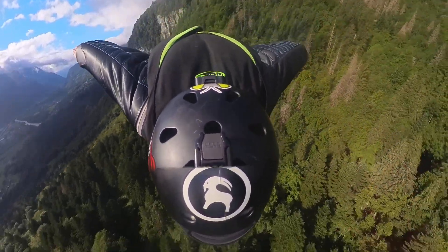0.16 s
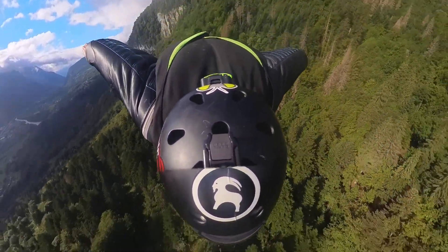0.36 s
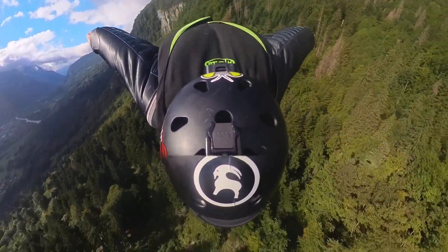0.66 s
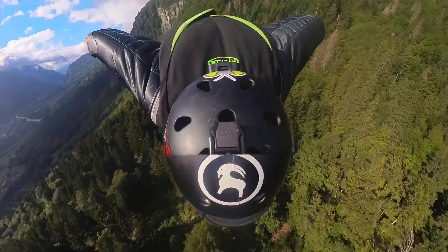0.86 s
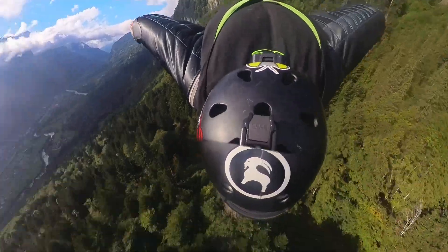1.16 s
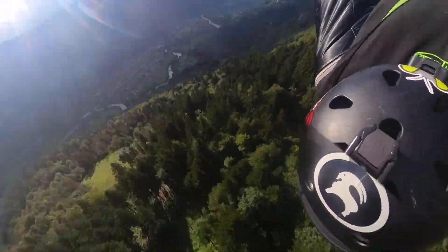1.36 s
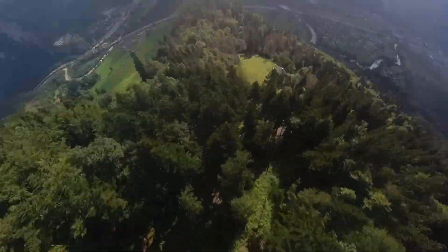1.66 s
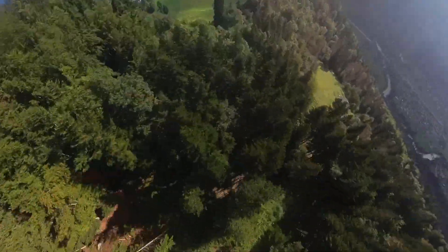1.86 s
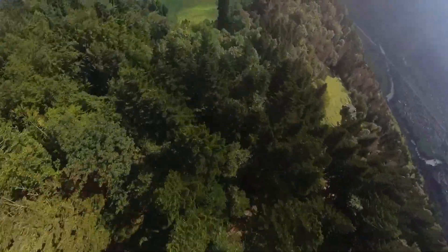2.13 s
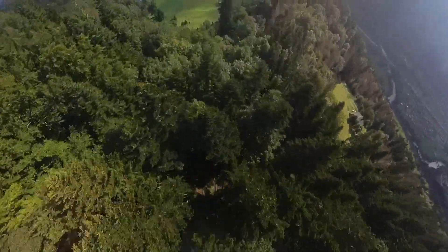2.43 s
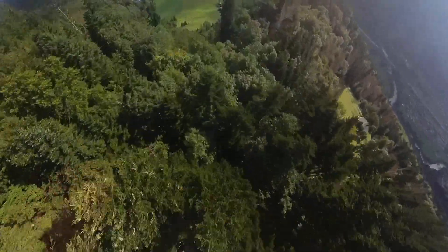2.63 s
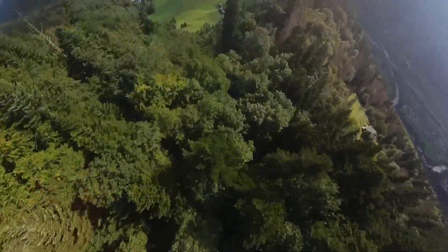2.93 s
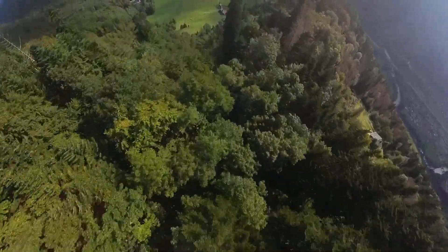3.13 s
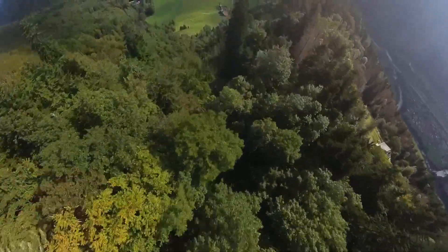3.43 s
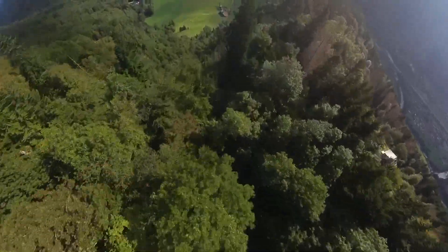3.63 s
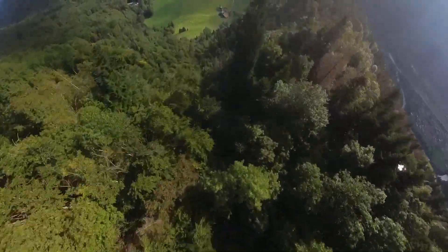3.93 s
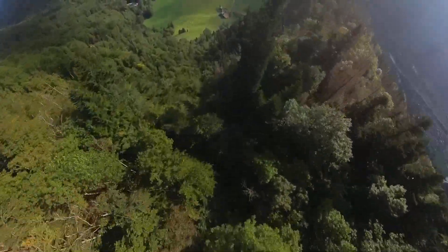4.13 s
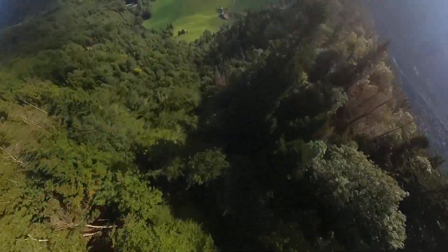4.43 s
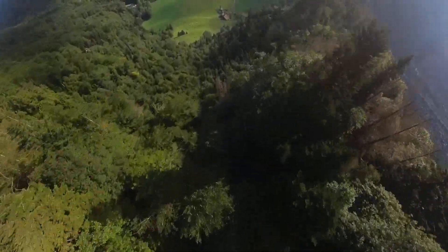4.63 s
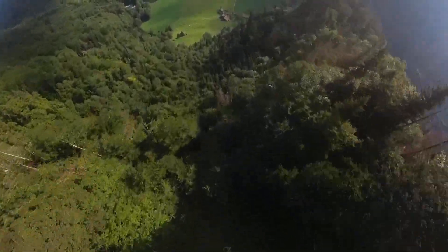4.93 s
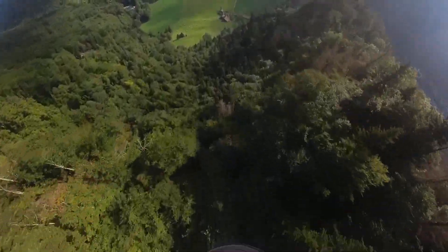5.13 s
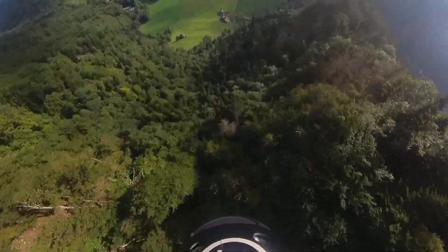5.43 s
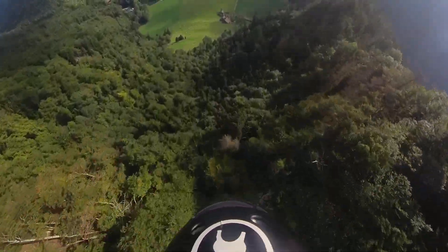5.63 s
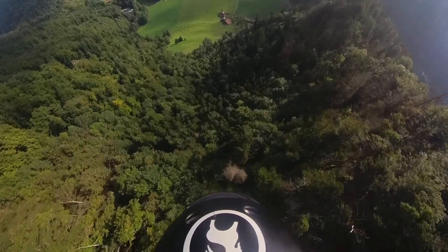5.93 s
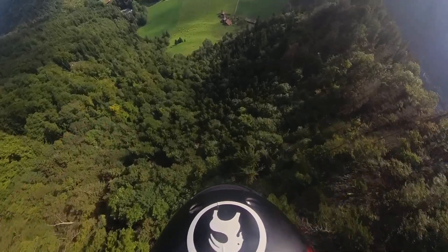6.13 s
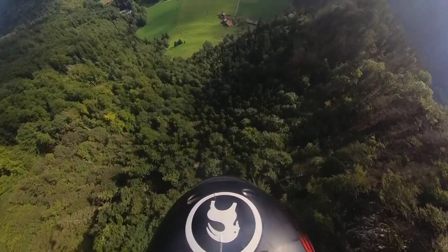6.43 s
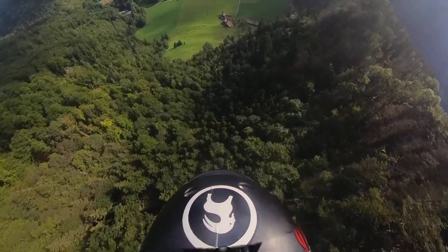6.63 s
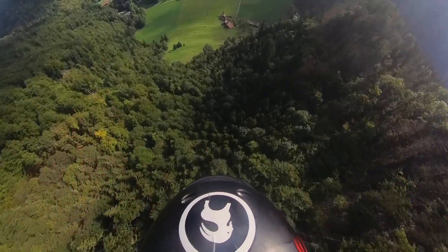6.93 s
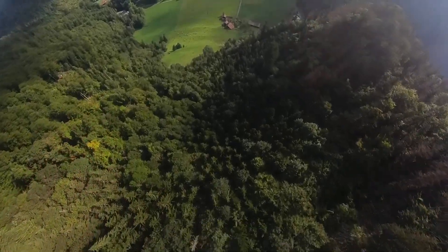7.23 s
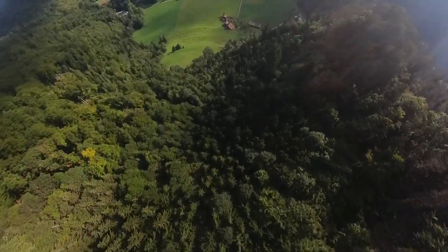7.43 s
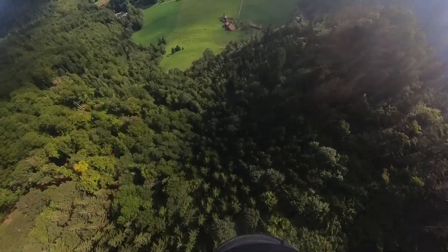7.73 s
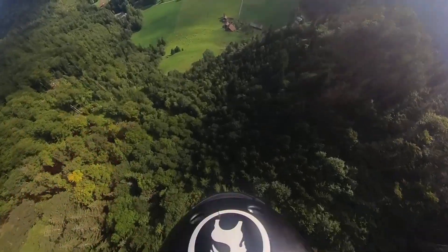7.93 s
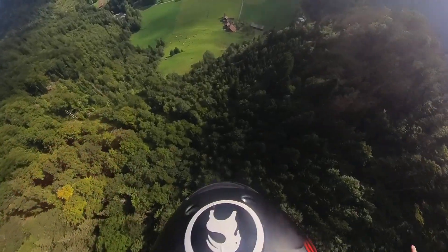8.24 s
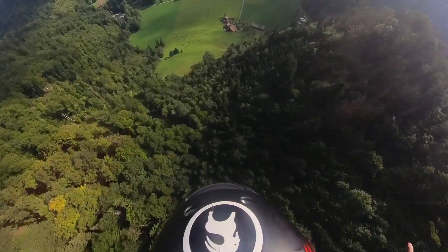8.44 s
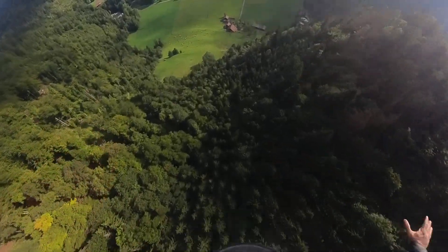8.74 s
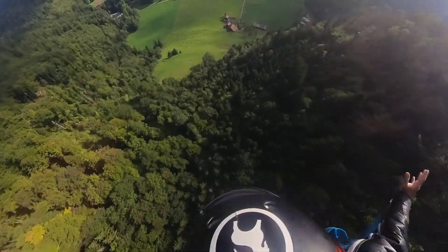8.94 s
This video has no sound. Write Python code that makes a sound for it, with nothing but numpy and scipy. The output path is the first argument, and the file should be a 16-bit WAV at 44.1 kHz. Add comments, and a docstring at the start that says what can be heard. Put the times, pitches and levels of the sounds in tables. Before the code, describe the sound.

Deep, buffeting wind rushes steadily across a microphone in fast flight, topped by a thin hiss and faint airy whistles.

```python
"""A deep, uneven rumble of wind, right on a helmet camera in a fast wingsuit glide above a forest.
Eddies buffet the microphone; the attached flow roars over the rumble, and fine turbulence hisses
at each port, with brief airy whistles where the air skims an edge.
The wind is mono in the bass and middle, wide in the treble."""
import sys
import numpy as np
from scipy import signal
from scipy.fft import rfft, irfft, next_fast_len
from scipy.io import wavfile
from scipy.ndimage import uniform_filter1d

SR = 44100
rng = np.random.default_rng(int(sys.argv[2]) if len(sys.argv) > 2 else 0)


def waveform_to_disk(signal):
    """Save audio, clipped to [-1, 1], as 16-bit WAV at the path in sys.argv[1]."""
    frames = np.transpose(np.atleast_2d(signal))
    scaled = np.clip(frames, -1, 1) * 32767
    samples = np.round(scaled).astype(np.int16)
    wavfile.write(sys.argv[1], SR, samples)


N = 400428
T = np.arange(N) / SR
TOP_HZ = 15830  # upper limit of the camera's sound

# Air speed over the housing. Each row: time in seconds, roar level in dB, hiss level in dB.
FLOW = [(0.03, -39, -51.5), (0.33, -37.5, -52), (0.83, -39, -53.5), (1.73, -30.5, -45.5), (1.78, -40, -53),
        (2.13, -41.5, -57), (2.33, -36, -50.5), (3.24, -38.5, -51.5), (3.29, -33.5, -49),
        (3.36, -41, -54.5), (3.51, -34, -49), (4.19, -31.5, -48.5), (4.44, -34, -51.5), (4.72, -32, -49.5),
        (5.02, -37.5, -53.5), (5.49, -30.5, -45), (5.82, -34.5, -48.5), (6.37, -30.5, -45.5),
        (6.5, -34.5, -48.5), (8.0, -34.5, -50.5), (8.5, -32, -46), (8.65, -32.5, -48.5), (9.0, -36.5, -50),
        (9.03, -35.5, -54)]
# Large eddies that hit the microphone. Each row: time in seconds, relative peak in dB.
THUMPS = [(0.095, -3), (0.412, -3), (1.756, -0.5), (1.818, -7), (1.956, 0), (2.028, -1.5), (2.637, -4),
          (3.039, -6), (3.166, -7), (3.311, -1), (3.352, -3.5), (4.766, -4.5), (4.82, -6.5), (4.878, -6),
          (7.376, -5), (8.366, -4), (8.976, 1)]
# Air skimming an edge. Each row: start and end in seconds, first and last pitch in Hz, level in dB.
WHISTLES = [(0.153, 0.75, 9700, 9400, -62), (0.722, 1.35, 9500, 9200, -59), (1.45, 1.783, 9700, 9900, -56),
            (2.10, 2.677, 9250, 9300, -56.5), (3.02, 3.16, 9900, 10100, -55),
            (3.20, 3.50, 10100, 10000, -56), (5.168, 5.48, 9350, 7850, -54),
            (7.818, 8.055, 9100, 7900, -52.5)]
# Spectra of the wind's four noise layers. Each row: frequency in Hz, relative density in dB.
RUMBLE = [(18, -28), (30, -20), (48, -4.5), (80, -6.5), (130, -.5), (180, 0), (300, -7), (450, -14.5),
          (700, -27), (1400, -48.5), (2200, -70)]
ROAR = [(100, -17), (250, 1), (450, 0), (620, -3), (820, -5.5), (1250, -11), (1440, -14.5), (1530, -19.5),
        (2000, -18.5), (2700, -25), (4000, -37.5)]
HISS = [(1700, -6), (2400, -11.5), (3000, 1.5), (4200, 2), (4800, 0), (7500, -5), (9500, -6.5),
        (12000, -6.5), (16000, -14)]
PORT_RING = [(9000, -9), (11500, -7.5), (13000, -2), (13900, 0.5), (15000, -4), (16000, -1)]
# Top-octave sheen of the ports against the hiss. Each row: time in seconds, relative level in dB.
SHEEN = [(0.68, -14), (0.76, -1), (1.3, 1.5), (2.6, 0), (4.5, 1), (7.25, 0.5), (7.33, 5), (7.4, -2),
         (7.9, 5), (8.75, -9), (9.0, 4)]
# The flow breaks away and the rumble swells. Each row: middle and length in seconds, swell in dB.
SURGES = [(0.13, 0.088, 3), (0.61, 0.057, 2.5), (1.775, .07, 6), (1.99, 0.15, 3.5), (2.64, 0.073, 6.5),
          (3.03, .08, 4.5), (3.16, .05, 6.5), (3.355, 0.041, 3), (4.96, 0.14, 2.5), (5.26, .06, 5),
          (7.28, .05, 3.5), (7.61, 0.052, 6)]
# Calm pockets between eddies, where the rumble sinks. Each row: middle and length in seconds, drop in dB.
LULLS = [(0.06, .06, 8), (0.51, .08, 5.5), (0.66, 0.053, 3), (0.95, 0.077, 5.5), (1.86, .1, 3),
         (2.17, 0.081, 7), (2.69, 0.1, 6.5), (3.09, 0.072, 7), (3.22, 0.18, 11.5), (3.41, 0.1, 7.5),
         (3.48, 0.13, 8), (5.05, 0.085, 8), (7.44, .08, 3), (8.89, 0.15, 3.5)]
# Short gusts that lift the roar and make it rasp. Each row: middle and length in seconds, lift in dB.
GUSTS = [(0.39, 0.11, 2), (1.18, 0.42, 1.5), (1.9, .1, 2.5), (2.48, 0.28, 0.5), (3.75, 0.23, 2),
         (4.12, 0.23, 3.5), (4.72, .09, 3), (5.22, 0.071, 2.5), (7.52, 0.16, 1.5), (8.28, 0.11, 0)]


def rumble(eddies, uneven_db, steady_s):
    """Eddies press on the microphone: jumpy from one to the next, with an even long-run force."""
    pressure = colour(rng.standard_normal(N) * undb(uneven_db * eddies), RUMBLE)
    power = uniform_filter1d(pressure ** 2, int(steady_s * SR))
    return pressure / np.sqrt(np.maximum(power, 0) + 1e-6)


def thumps(hz, width_s, trim_db):
    """A vortex core passes the microphone: a swing of suction between two shoulders of pressure."""
    out = np.zeros(N)
    stretches = np.exp(0.23 * rng.standard_normal(len(THUMPS)))
    for (at, db), stretch in zip(THUMPS, stretches):
        near = np.abs(T - at) < .04
        t = (T[near] - at - width_s) / stretch
        out[near] -= undb(db + trim_db) * np.exp(-.5 * (t / width_s) ** 2) * np.cos(2 * np.pi * hz * t)
    return out


def roar(eddies, rasp):
    """Flow over the housing: eddies break into small bursts and spikes that give it a torn edge."""
    bursts = undb(0.75 * eddies + 0.8 * rasp + 0.74 * walk(500))
    torn_air = unit(rng.standard_normal(N) * bursts)
    return colour(torn_air + undb(-9.5) * snaps(per_s=90, spread_db=2.5), ROAR)


def snaps(per_s, spread_db):
    """Sparse, sharp pressure spikes from the smallest vortices; most are weak."""
    hits = rng.random(N) < per_s / SR
    size = np.minimum(rng.exponential(size=N), 3)
    return unit(hits * undb(spread_db * size) * np.sign(rng.standard_normal(N)))


def hiss(spectrum, eddies, shared, eddy_db, grain_db):
    """Fine turbulence right at the ports, stirred by the passing eddies."""
    return colour(port_noise(shared) * undb(eddy_db * eddies + grain_db * walk(300)), spectrum)


def whistles(width_hz, fade_s, waver, trim_db):
    """Unsteady shedding at an edge: a narrow band of noise whose pitch glides and wavers slightly."""
    out = np.zeros((2, N))
    narrow = signal.butter(2, width_hz / 2, fs=SR, output="sos")
    band = unit(signal.sosfilt(narrow, port_noise(shared=0.93))) * undb(trim_db + 2.0 * walk(35))
    drift = 1 + waver * walk(40)
    for start, end, first_hz, last_hz, db in WHISTLES:
        on = (T > start) & (T < end)
        t = T[on]
        hz = np.interp(t, [start, end], [first_hz, last_hz]) * drift[on]
        fade = np.minimum(np.minimum(t - start, end - t) / fade_s, 1)
        carrier = np.sqrt(2) * np.sin(2 * np.pi * np.cumsum(hz) / SR)
        out[:, on] += undb(db) * fade * band[:, on] * carrier
    return out


def flicker(x, depth_db, bands=24):
    """Each band of the hiss flutters on its own."""
    size = next_fast_len(N)
    spectrum = rfft(x, size)
    hz = np.arange(size // 2 + 1) * SR / size
    band_of_bin = np.round(np.interp(hz, np.geomspace(2000, TOP_HZ, bands), np.arange(bands)))
    out = 0
    for k in range(bands):
        band = irfft(spectrum * (band_of_bin == k), size)[..., :N]
        out = out + band * undb(depth_db * walk(55))
    return unit(out)


def port_noise(shared):
    """White noise at the two microphone ports, partly the same in both."""
    return np.sqrt(shared) * rng.standard_normal(N) + np.sqrt(1 - shared) * rng.standard_normal((2, N))


def colour(x, points):
    """Filter by a (Hz, dB) spectrum that rolls off past both ends; rms 1."""
    hz, db = np.transpose(points)
    size = next_fast_len(N)
    f = np.maximum(np.arange(size // 2 + 1) * SR / size, 1)
    gain = undb(np.interp(np.log(f), np.log(hz), db))
    skirts = np.minimum(f / hz[0], 1) * np.minimum(hz[-1] / f, 1) ** 2
    return unit(irfft(rfft(x, size) * gain * skirts, size)[..., :N])


def walk(per_s):
    """A smooth random wander that changes about per_s times a second; rms 1."""
    hold = int(SR / per_s)
    steps = np.repeat(rng.standard_normal(N // hold + 1), hold)
    return unit(uniform_filter1d(uniform_filter1d(steps, hold), hold)[:N])


def swells(table):
    """A smooth rise and fall in dB for each (middle, length, dB) row."""
    return sum(db * np.cos(np.pi * np.clip((T - at) / length, -.5, .5)) ** 2 for at, length, db in table)


def curves(table):
    """Each level column of a table, joined by straight lines in time."""
    times, *columns = np.transpose(table)
    return [np.interp(T, times, column) for column in columns]


def undb(db):
    """Decibels to gain."""
    return 10 ** (np.asarray(db) / 20)


def unit(x):
    """Scale to rms 1."""
    return x / np.sqrt(np.mean(x ** 2))


def scene():
    """At the helmet, rumble, roar and hiss ride the same eddies; surges trade roar for rumble."""
    roar_db, hiss_db = curves(FLOW)
    sheen_db, = curves(SHEEN)
    surge_db, gust_db = swells(SURGES), swells(GUSTS)
    eddies = walk(110)
    rasp = gust_db * walk(120)  # fast flutter inside a gust
    rumble_db = -19.5 + 1.14 * walk(18) + surge_db - swells(LULLS)
    stir_db = gust_db - 0.33 * surge_db + 0.5 * walk(12)
    roar_db += stir_db
    hiss_db += 0.73 * stir_db  # the hiss swings less than the roar

    low = undb(rumble_db) * rumble(eddies, uneven_db=1.24, steady_s=.06)
    low += thumps(hz=162, width_s=0.0034, trim_db=-6.0)
    mid = undb(roar_db + 5.0) * roar(eddies, rasp)
    port_hiss = hiss(HISS, eddies, shared=0.29, eddy_db=0.14, grain_db=.5)
    high = undb(hiss_db + 3) * flicker(port_hiss, depth_db=2.5)
    port_ring = hiss(PORT_RING, eddies, shared=0.28, eddy_db=0.2, grain_db=1.2)
    top = undb(hiss_db + sheen_db + 3.5) * flicker(port_ring, depth_db=1.8)
    return low + mid + high + top + whistles(width_hz=1100, fade_s=0.05, waver=0.024, trim_db=0.9)


def record(dry):
    """The camera merges its ports below the treble and rounds the peaks; its top octave starts muffled."""
    wide_above_hz, treble_opens_s = 3170, 0.733
    mid, side = (dry[0] + dry[1]) / 2, (dry[0] - dry[1]) / 2
    side = signal.sosfiltfilt(signal.butter(10, wide_above_hz, "high", fs=SR, output="sos"), side)
    sound = np.tanh(.8 * np.array([mid + side, mid - side])) / .8
    muffled = signal.sosfiltfilt(signal.butter(12, 10400, fs=SR, output="sos"), sound)
    muffled = signal.sosfiltfilt(signal.butter(1, 11000, fs=SR, output="sos"), muffled)
    sound = np.where(T < treble_opens_s, muffled + undb(-13) * (sound - muffled), sound)
    return signal.sosfilt(signal.ellip(12, .1, 80, TOP_HZ, fs=SR, output="sos"), sound)


dry = scene()
out = record(dry)
waveform_to_disk(out)
```